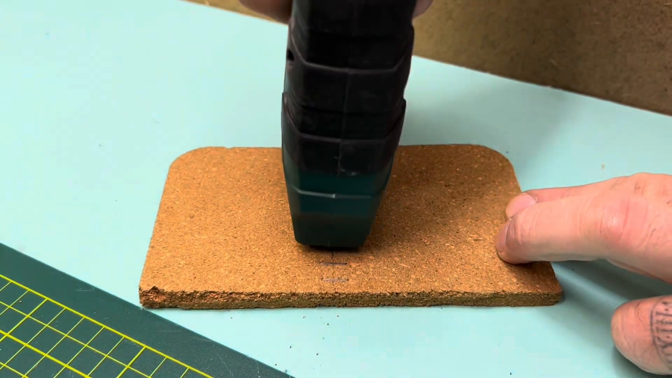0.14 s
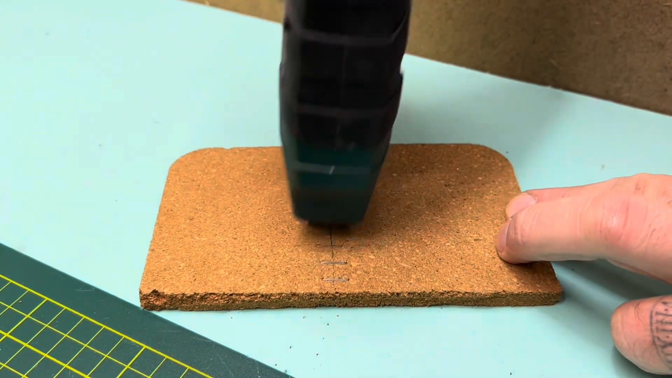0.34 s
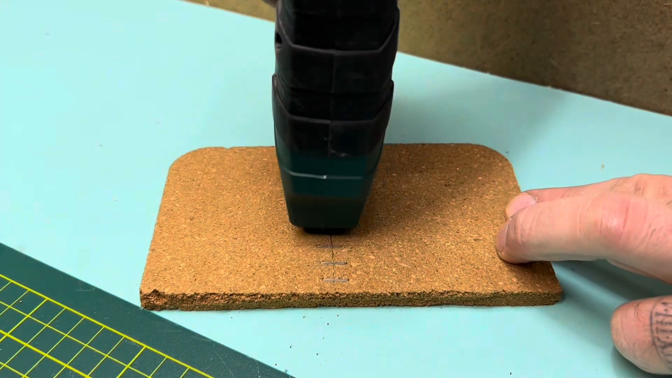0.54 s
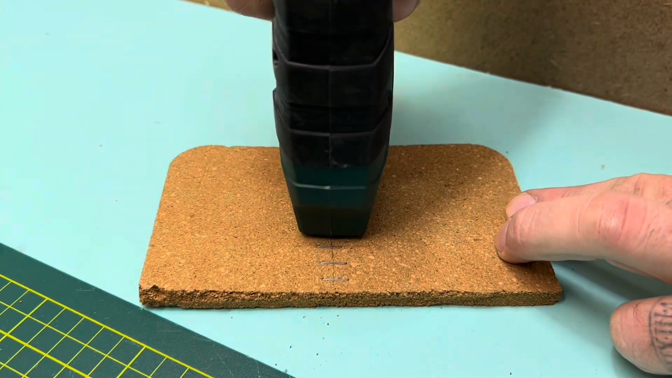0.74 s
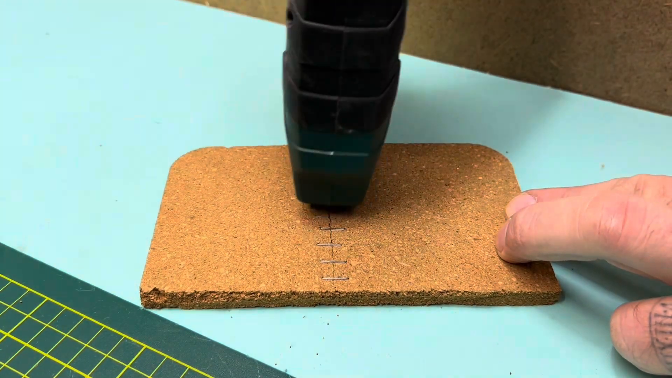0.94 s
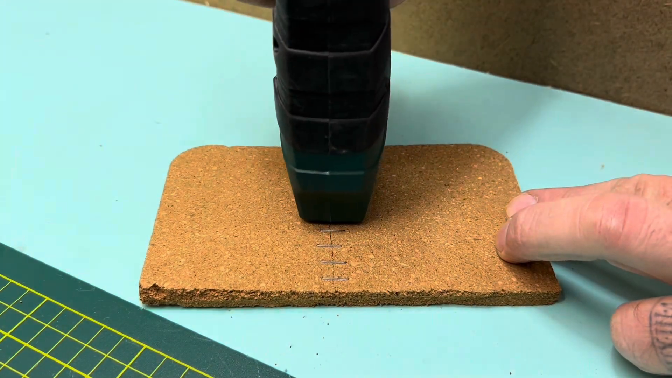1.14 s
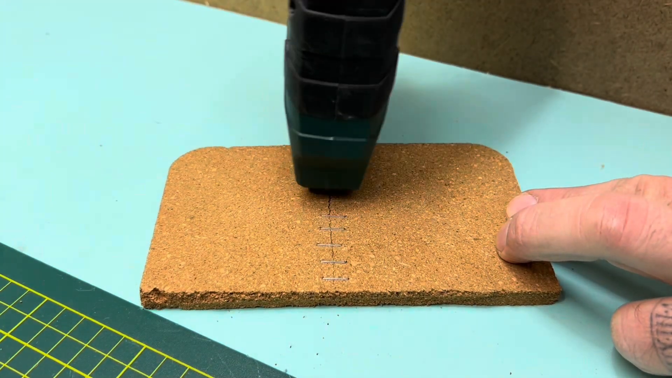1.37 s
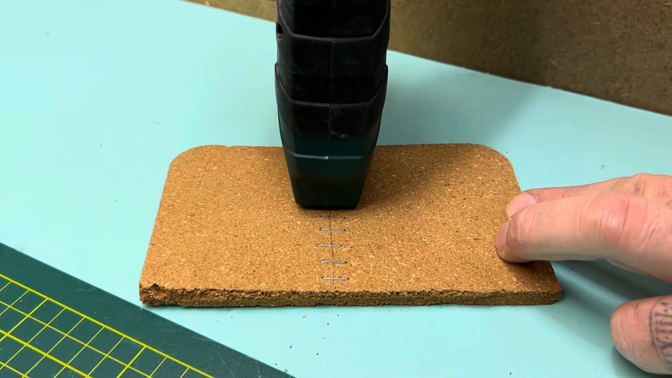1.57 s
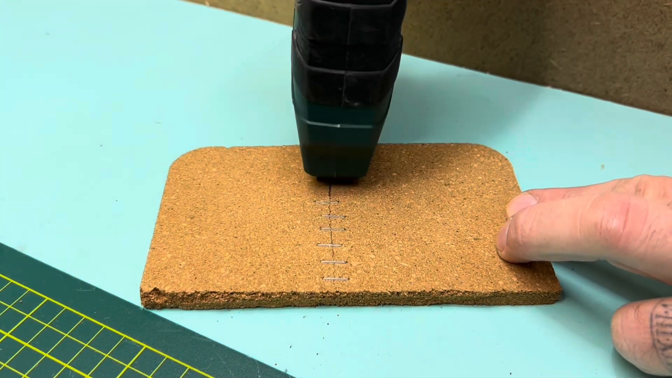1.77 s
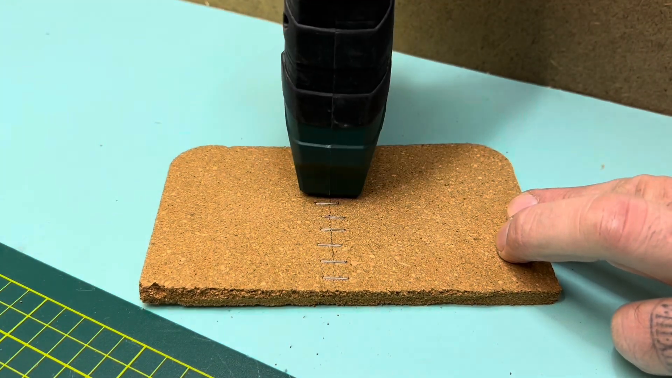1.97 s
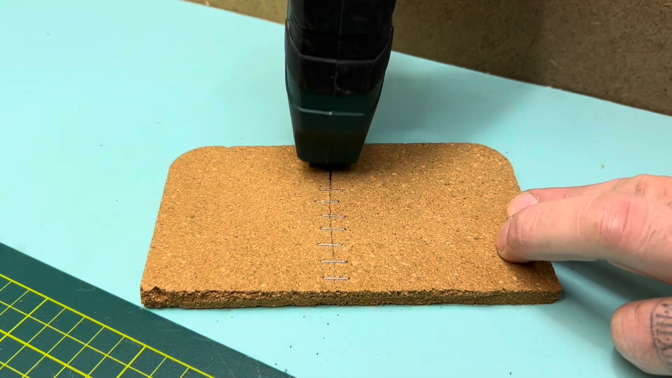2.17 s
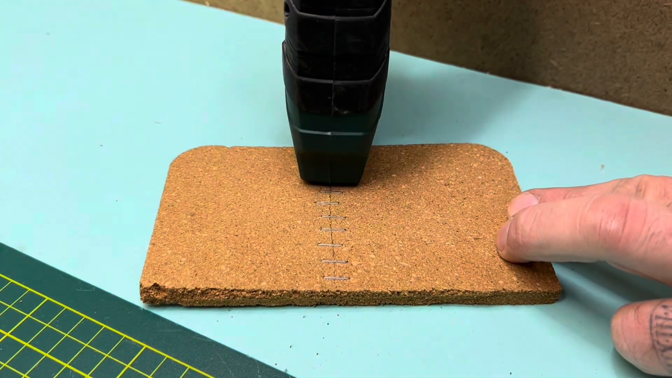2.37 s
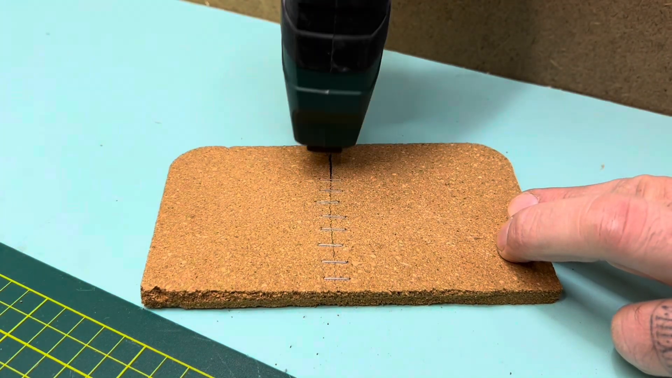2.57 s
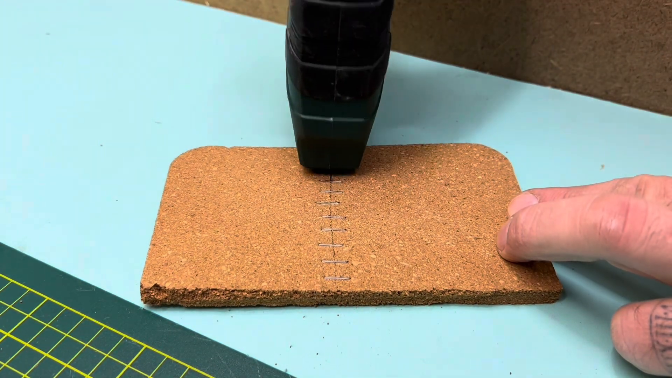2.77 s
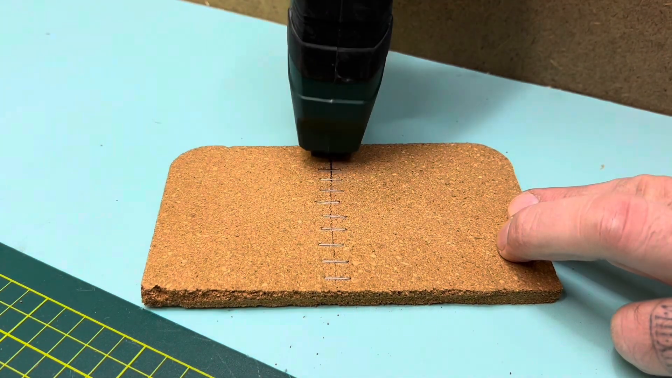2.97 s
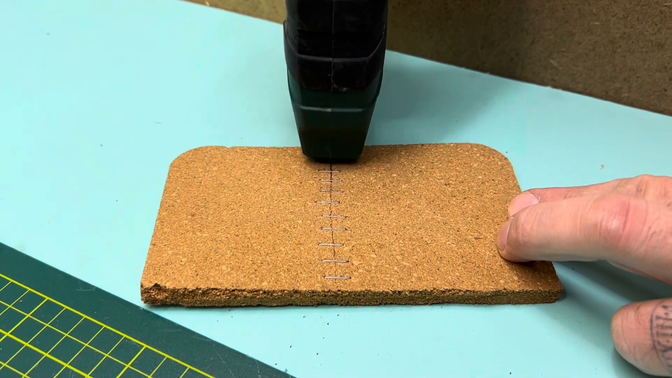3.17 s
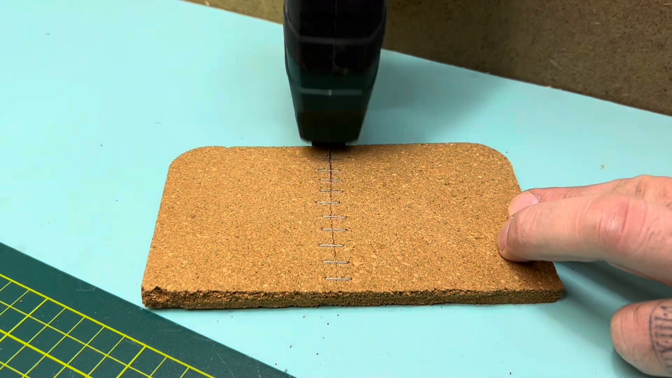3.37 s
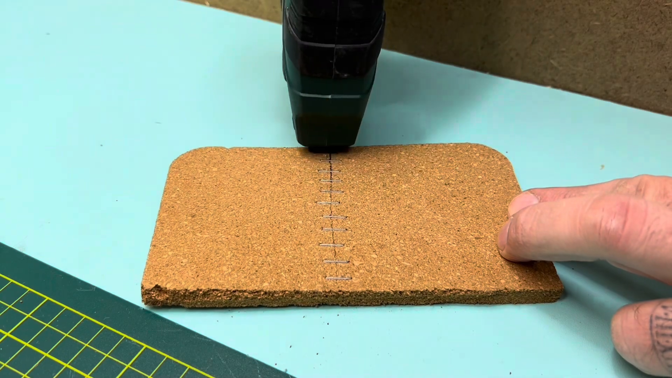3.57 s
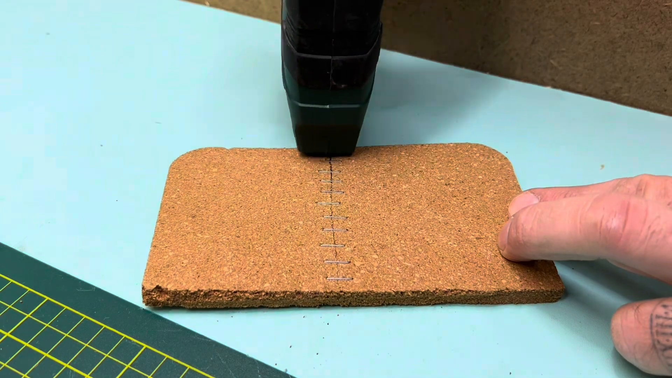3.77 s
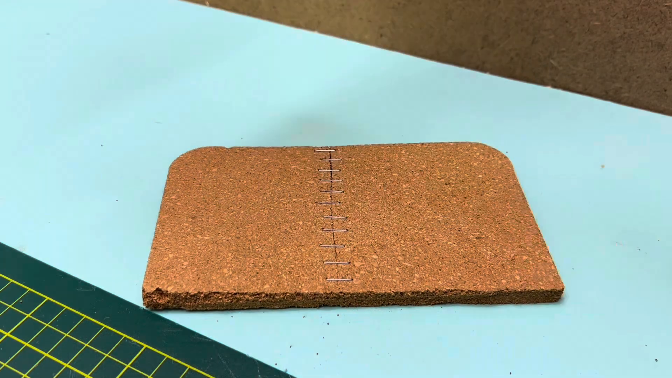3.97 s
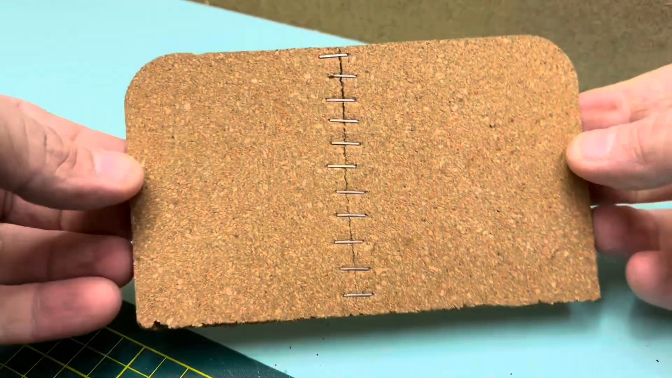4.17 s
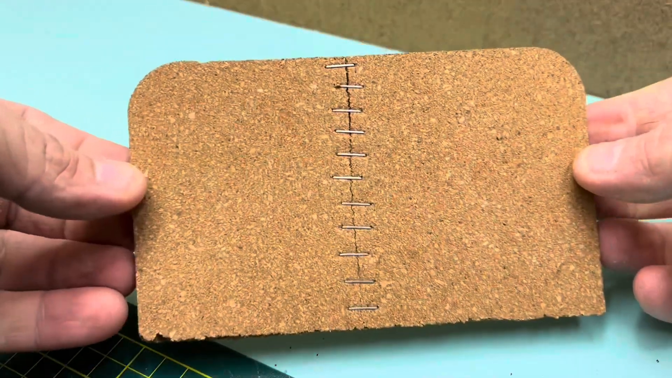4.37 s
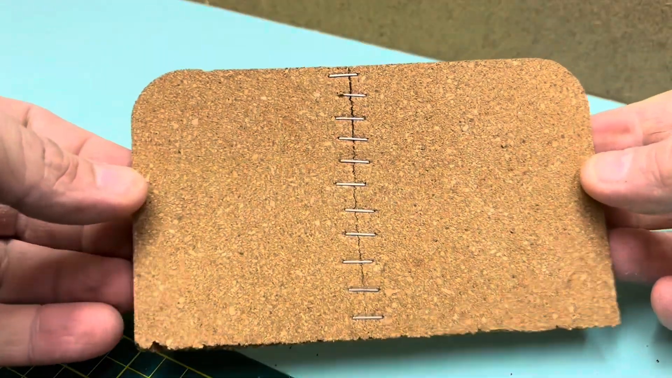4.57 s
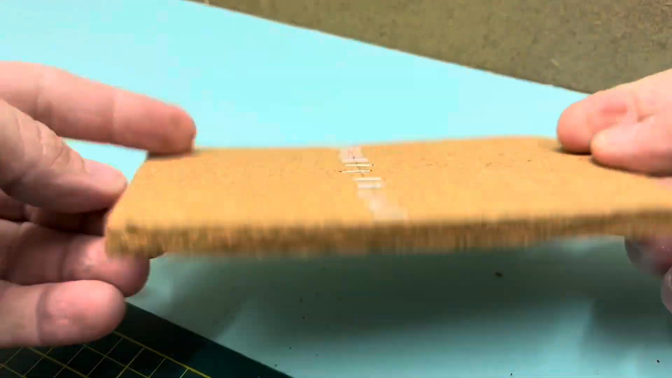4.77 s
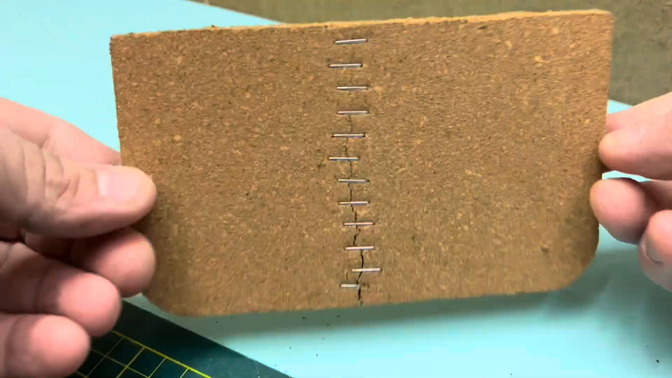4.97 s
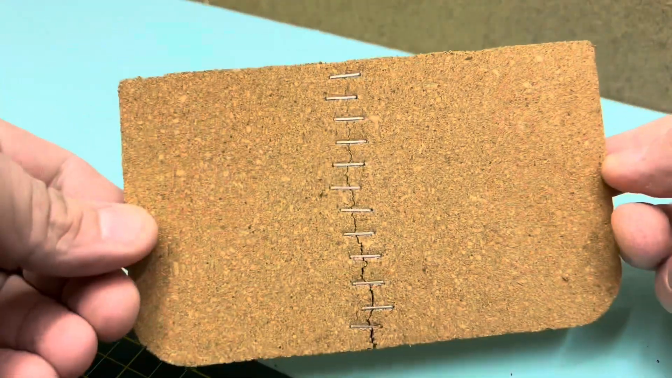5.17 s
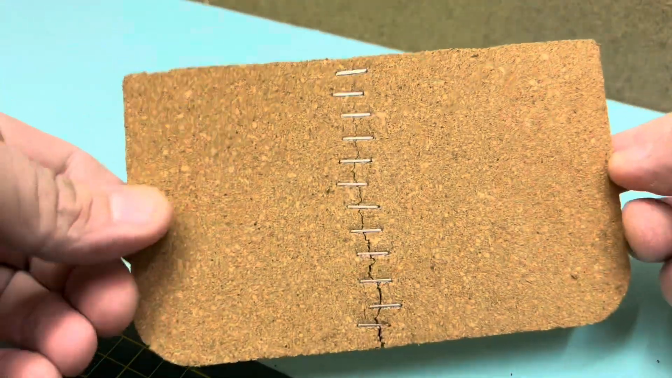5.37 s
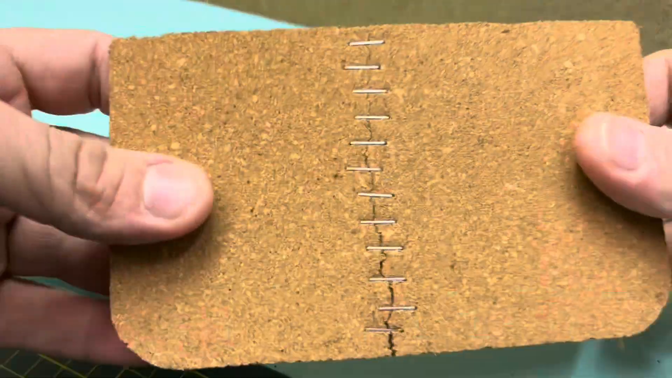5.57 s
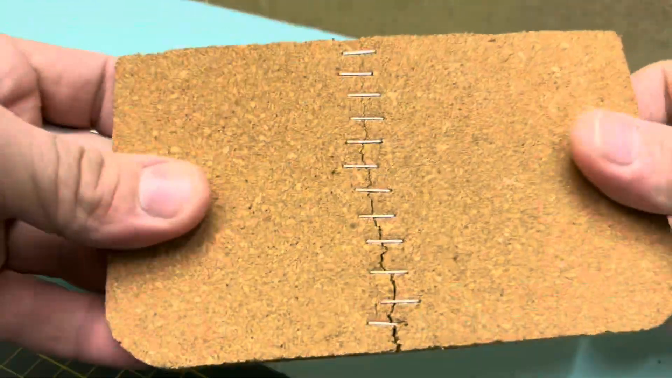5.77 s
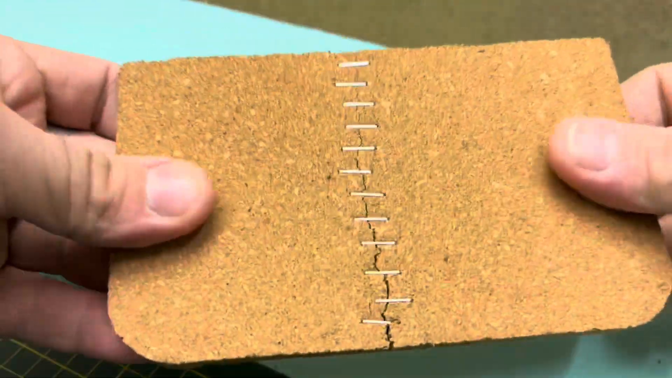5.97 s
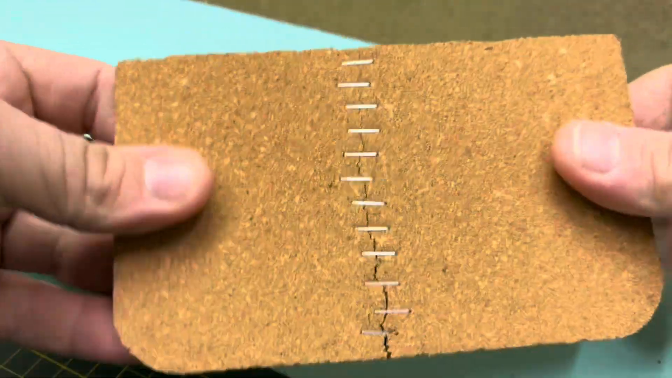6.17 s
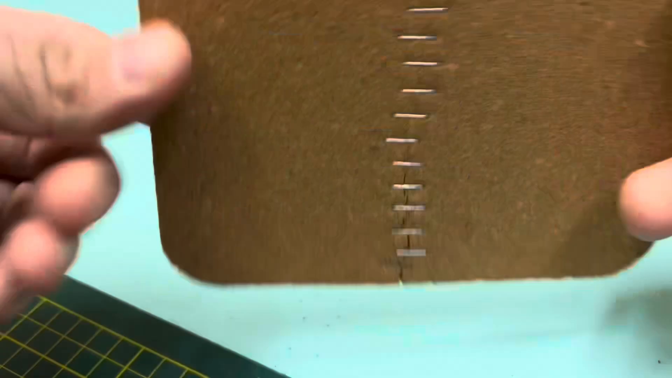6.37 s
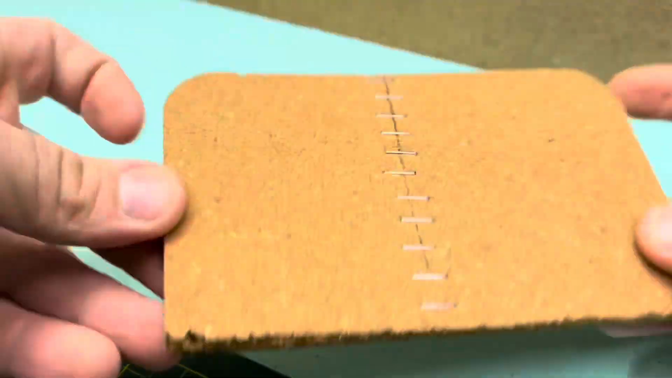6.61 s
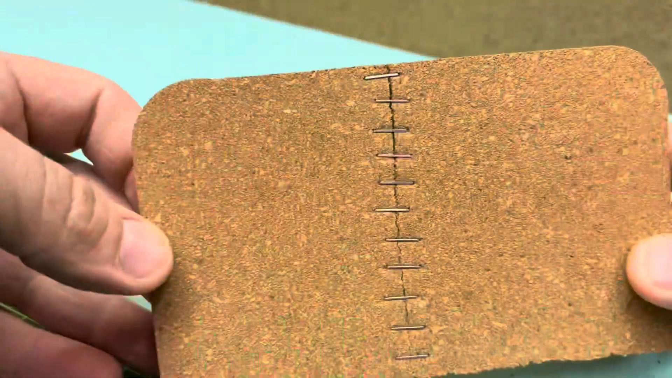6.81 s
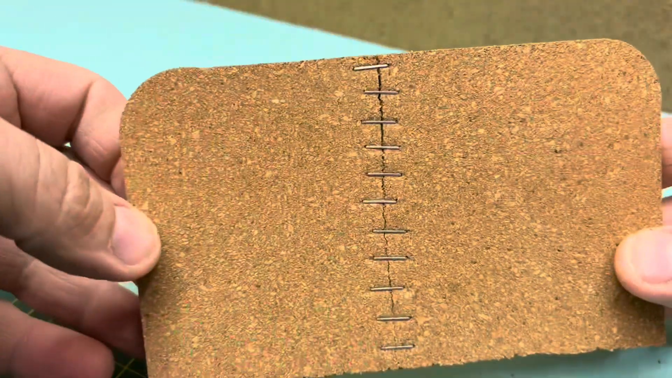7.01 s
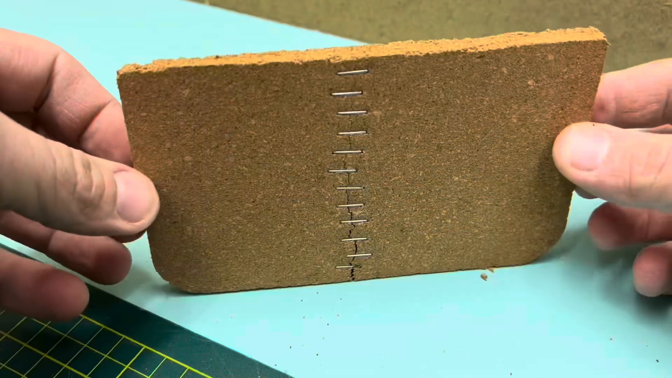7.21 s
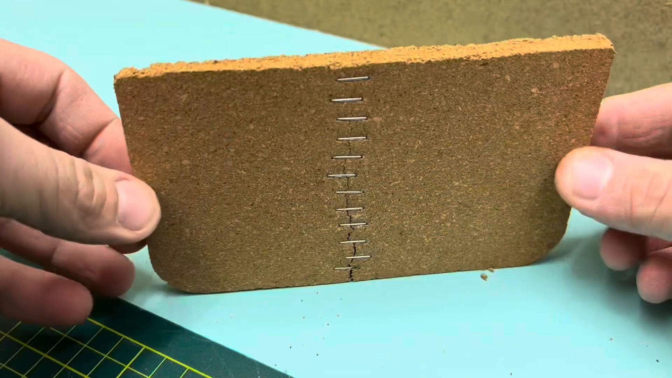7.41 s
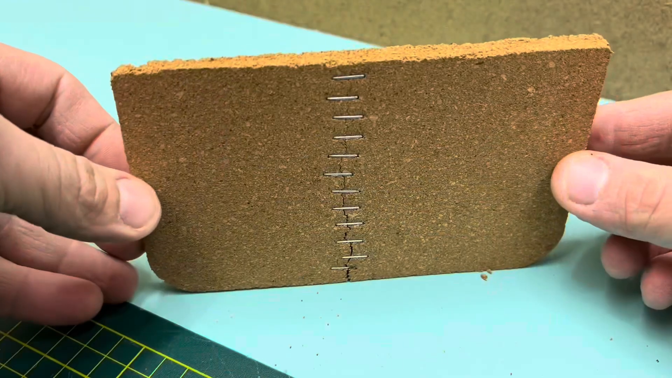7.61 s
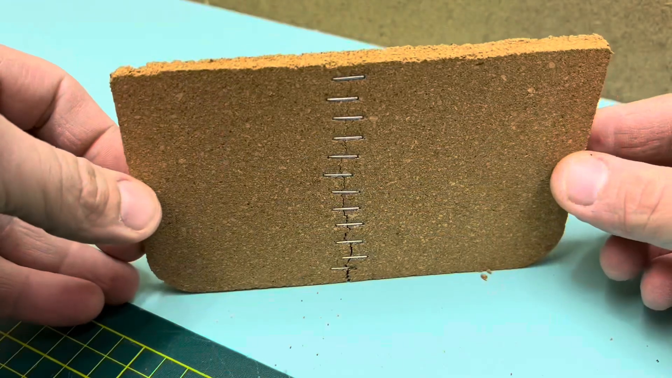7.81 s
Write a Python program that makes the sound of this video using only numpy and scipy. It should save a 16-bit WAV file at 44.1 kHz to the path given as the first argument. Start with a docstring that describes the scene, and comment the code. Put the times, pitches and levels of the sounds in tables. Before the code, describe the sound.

Close stereo pickup at a tabletop in a small room: nine loud stapler shots, a little over two per second, each with a short zipping motor and gear whine leading into a bright snap with a short plastic and metal ring. Small plastic knocks fall between them. At about four seconds it abruptly gives way to faint hiss and rumble, then very quiet skin rasps, crumb ticks and soft pats on cork.

```python
"""Staple gun on a cork mat

A cordless electric staple gun fires nine staples into a cork mat on a table, close to the microphone.
In each cycle the trigger clicks, the motor whine spins up, the gears slow as they wind the spring,
and the striker bangs home: gliding tones and noise, then noise bursts and ringing modes.
Then fingers pick up the mat and turn it over: swelling rasps, ticks and soft bumps above a faint hiss."""
import sys
import numpy as np
from scipy import signal
from scipy.fft import rfft, irfft
from scipy.io import wavfile

SR = 44100
rng = np.random.default_rng(int(sys.argv[2]) if len(sys.argv) > 2 else 0)


def store_wav(level_fs):
    """Save 16-bit WAV to argv[1]."""
    pcm = np.round(np.clip(np.atleast_2d(level_fs), -1, 1) * 32767)
    wavfile.write(sys.argv[1], SR, pcm.T.astype(np.int16))


N = 346185

# the nine shots: (release time [s], motor whine [dB], gears [dB], crack [dB], thump [dB],
# press that sets bass and after-hum [dB], latch slip [dB], spring ring [dB])
SHOTS = [(0.2897, 0.5, -3.5, 4, -1.5, -3, 0.4, -68), (0.806, 0.5, -1, 3.5, -2, -19.5, -0.3, -64),
         (1.2277, 2, -0.5, 2.7, -3, -0.5, -0.4, -61), (1.6551, 6, 0.6, 3, -0.8, 10, -2, -63),
         (2.0663, 5.5, -2, 1.4, -2, 8.5, 3, -76), (2.4713, 7.5, 0.3, 2.2, -3.5, 12, 0.5, -75.5),
         (2.922, 11, 1, 2.7, -3, 10, -6, -83), (3.3283, 6, -0.5, 3, -2.5, 2.2, -3, -77),
         (3.763, -4, -2.2, 4.5, -4, -12.5, -3, -77)]
# overtones of the gear tooth rate, in order: (multiple, level [dB])
TOOTH_OVERTONES = [(1, -17), (2, -1), (3, -4), (4, -15), (5, -14.5), (6, -16.5)]
# metal clicks as the cam engages, the pawl drags, the striker leaves and lands, the motor stops:
# (time from release [s], level [dB], decay [s], treble tilt [dB per octave])
METAL_CLICKS = [(-.0528, -25, 0.0027, 0), (-.006, -25.5, 0.0013, 1), (-.0005, -15.5, .0012, 2),
                (.0006, -14.5, .0008, -2.5), (.059, -51, .004, -7)]
# ringing modes of gun housing and table: (frequency [Hz], level [dB], longest 60 dB decay [s])
BODY_MODES = [(194, -46, .15), (285, -31.5, .04), (358.5, -24.5, 0.11), (447, -26, .04), (508, -23.5, .075),
              (523.2, -28, 0.034), (845, -22, 0.072), (960, -28, 0.018), (1100, -29.5, 0.089),
              (1233, -32.5, 0.049), (1420, -34, 0.045), (1658, -22, 0.063), (1686, -29, 0.038),
              (1930, -44.5, 0.08), (1852, -41, .06), (2403.5, -44, .06), (3219, -42, .1)]
# plastic knocks of the trigger and of the nose set down: (time [s], level [dB], treble [dB])
KNOCKS = [(0.174, -53.5, -5), (0.69, -46.5, -12), (1.112, -47.5, -3), (1.545, -46, -11.5), (1.956, -39, -7),
          (2.359, -35.5, -3.5), (2.809, -35.5, 0), (3.212, -41, -4), (3.41, -30.5, -23), (3.459, -41, -43),
          (3.583, -50, -18), (3.612, -54, -19), (3.652, -39, -3)]
# soft bumps of the mat in the hands: (time [s], level [dB], bass [dB])
MAT_BUMPS = [(4.909, -52, -12), (5.039, -75, 22), (5.473, -58, 7), (5.536, -44.5, 2.5), (6.259, -58, 3.5),
             (6.379, -60, -14.5), (6.459, -53, -11), (7.359, -57.5, 2.5), (7.409, -59.5, -8.5)]
# cork crumbs catching on the skin: (time [s], level [dB])
CRUMBS = [(4.7112, -61), (5.4585, -51), (5.494, -53.5), (5.5378, -59), (5.7094, -60), (6.261, -58),
          (6.4579, -63), (6.5365, -65), (6.5879, -59), (6.7251, -60), (7.358, -64)]
# fingers sliding on cork: (middle [s], length [s], level [dB])
STROKES = [(4.63, .025, -82), (4.72, .025, -75), (4.812, 0.074, -84), (5.424, .05, -77),
           (5.512, 0.093, -67), (5.6, .016, -77.5), (5.705, .035, -83), (6.159, 0.0456, -73.5),
           (6.252, 0.095, -72.5), (6.375, 0.079, -74), (6.468, 0.0648, -70), (6.549, 0.03112, -71),
           (6.728, 0.02847, -82), (7.362, .028, -72.5), (7.428, 0.03027, -80.5)]
# colour of the motor brushes: (frequency [Hz], level [dB])
BRUSH_COLOUR = [(150, -49), (600, -23), (1500, -6.5), (2800, -8.5), (3500, 4.5), (4250, -14.5), (5200, -6),
                (7000, -4.5), (8200, -1), (12000, 3), (13700, 3.5), (16000, 0)]
# colour of grinding gears: (frequency [Hz], level [dB])
GRIND_COLOUR = [(100, -37.5), (400, -6.5), (1100, 1.5), (2000, -2), (3800, -4), (5000, 4), (7000, 1),
                (9500, -4.5), (11500, 3.5), (12600, -8.5), (13900, 7.5), (16000, -3)]
# colour of struck metal: (frequency [Hz], level [dB])
METAL_COLOUR = [(60, -62), (300, -13), (1500, 0.5), (3200, -7), (5400, -3), (6500, -1), (7800, 1),
                (9000, -4.5), (10300, 1.5), (13500, -1.5), (16000, -3.5)]
# colour of the nose thumping the cork: (frequency [Hz], level [dB])
THUMP_COLOUR = [(25, -20.5), (100, -19.5), (180, -8.5), (320, -4), (500, 6), (680, -11.5), (920, 0),
                (1300, -17), (2200, -32), (6000, -61)]
# colour of knocking plastic, also used for the mat's pats: (frequency [Hz], level [dB])
PLASTIC_COLOUR = [(60, -50.5), (150, -26.5), (220, -6), (340, 12), (550, 1), (1000, -2), (1700, -10.5),
                  (3000, -25), (8000, -40.5)]
# colour of skin on cork: (frequency [Hz], level [dB])
SKIN_COLOUR = [(100, -9), (450, 1), (1000, 10.5), (2500, 4.5), (6000, 2), (9000, 2), (15000, 0.5)]
# colour of the high hiss: (frequency [Hz], level [dB])
HIGH_HISS_COLOUR = [(24, -94.5), (40, -59.5), (169, -12.5), (392, -4), (627, -17.5), (824, -13),
                    (1140, -22.5), (1260, -33.5), (2220, -34), (2580, -15.5), (3390, -23.5), (4030, -10),
                    (5560, -7), (6950, -11), (15000, -53)]
# colour of the rumble: (frequency [Hz], level [dB])
RUMBLE_COLOUR = [(18, -62), (30, -42), (81, -8), (135, -3), (232, -2.5), (287, -14.5), (373, -9.5),
                 (888, -28.5), (1320, -12.5), (1500, -19.5), (1950, -35), (3300, -120)]
# colour of the lower hiss: (frequency [Hz], level [dB])
LOW_HISS_COLOUR = [(1000, -28.5), (1330, -13.5), (1580, -15), (2100, 1), (2700, 3.5), (3400, 1),
                   (4200, -13.5), (5300, -26.5), (6400, -25.5), (8500, -37), (15000, -48)]
# the gun's phase between the two microphone ports: (frequency [Hz], lead of the left [radians])
PORT_PHASE = [(0, -1), (2070, -0.55), (2330, 1), (2840, 1.07), (3360, 1.0), (4650, 1.35), (5430, 1.5),
              (5680, 6), (6290, 4), (6890, 5), (12300, 7.5), (13400, 6.5), (14100, 6.5), (16400, 9)]
# resonances of the gun's shell and steel magazine: (frequency [Hz], width [Hz], boost [dB])
SHELL_BANDS = [(4586, 120, -0.5), (4840, 260, 6.5), (5380, 190, 8.5), (6590, 370, 5.5), (7040, 270, 3),
               (8040, 200, 9), (8210, 140, 4), (10264, 120, 3.5), (11613, 250, 5.5), (13570, 250, 0.5),
               (14228, 120, 6.5)]
# brief dips of the lower hiss and rumble: (time [s], depth [dB])
DIPS = [(4.118, -16.5), (7.182, -17.5)]

# top of the passband; no gear overtone sounds above it either
TOP_HZ = 15900
# a cycle's sound starts LEAD_S before the release and lasts CYCLE_S
LEAD_S, CYCLE_S = 0.12, 0.4
# times from release: motor switched on, cam takes up the spring, load peaks, motor stops
SWITCH_S, ENGAGE_S, PEAK_LOAD_S, STOP_S = -0.093, -0.0528, -0.0183, 0.06
# nominal motor whine and gear tooth rate at full speed
MOTOR_HZ, TOOTH_HZ = 984, 5200
# share of full speed reached at once, and share lost at peak load
KICK, SAG = 0.5, 0.571
# time constants of the motor's spin-up and run-down
SPIN_UP_S, RUN_DOWN_S = 0.0105, 0.045
# the high hiss cross-fades to the lower one around this moment
CHANGE_S, CROSSFADE_S = 3.912, 0.015


def amp(db):
    """Decibels to gain."""
    return 10 ** (np.asarray(db) / 20)


def unit(x):
    """Scale to rms 1."""
    return x / np.sqrt(np.mean(x ** 2))


def across(points, size, tilt=0):
    """Read (Hz, value) points at the bins of a transform, with a slope per octave."""
    hz, value = np.transpose(points)
    octaves = np.log2(np.abs(hz) + 1)
    bins = np.log2(np.fft.rfftfreq(size, 1 / SR) + 1)
    return np.interp(bins, octaves, value + tilt * (octaves - octaves[-1]))


def noise(points, size, tilt=0):
    """Coloured noise of rms 1."""
    spectrum = rfft(rng.standard_normal(size)) * amp(across(points, size, tilt))
    return unit(irfft(spectrum, size))


def pulse(points, size, tilt=0):
    """The most compact causal pulse with a given spectrum, peak 1."""
    cepstrum = irfft(np.log(amp(across(points, size, tilt))), size)
    # folding the cepstrum forward in time gives minimum phase
    cepstrum[1:size // 2] *= 2
    cepstrum[size // 2 + 1:] = 0
    y = irfft(np.exp(rfft(cepstrum)), size)
    return y / np.abs(y).max()


def fade(t, decay):
    """Sudden onset at t = 0, then exponential decay."""
    return (t >= 0) * np.exp(-np.abs(t) / decay)


def rise(t, length):
    """A straight ramp from 0 at t = 0 to 1 after the given length."""
    return np.clip(t / length, 0, 1)


def release(t, decay):
    """Hold at 1 until t = 0, then exponential decay."""
    return np.exp(-np.maximum(t, 0) / decay)


def add(track, s, sound):
    """Mix a sound into a track from time s on."""
    i = max(int(s * SR), 0)
    track[..., i:i + sound.shape[-1]] += sound[..., :track.shape[-1] - i]


def spread(make, likeness):
    """Two channels that share part of a random sound."""
    share = np.clip(likeness, 0, 1)
    common = np.sqrt(share) * make()
    return common + np.sqrt(1 - share) * np.array([make(), make()])


def burst(points, envelope, tilt=0):
    """A rough contact force, following an envelope, heard through a material's colour."""
    colour = pulse(points, size=2048, tilt=tilt)
    force = envelope * rng.standard_normal(len(envelope))
    return signal.fftconvolve(force, colour / np.linalg.norm(colour))[:len(envelope)]


def echoes(x, colour, db, decay):
    """A fading cloud of reflections, different at each port."""
    t = np.arange(SR // 2) / SR
    cloud = [unit(burst(colour, fade(t - 0.0006, decay))) for _ in range(2)]
    cloud = np.array(cloud) / np.sqrt(len(t))
    return amp(db) * signal.fftconvolve(np.atleast_2d(x), cloud, axes=1)[:, :x.shape[-1]]


def afterwards():
    """0 during the work, 1 once the hiss has changed."""
    return rise(np.arange(N) / SR - CHANGE_S + CROSSFADE_S / 2, CROSSFADE_S)


def high_hiss(db=-63):
    """A faint high hiss: coloured noise partly shared by the two channels."""
    return amp(db) * spread(lambda: noise(HIGH_HISS_COLOUR, N), likeness=0.54)


def low_hiss(db=-59, pan_db=5.0, lag=8):
    """A lower hiss, stronger on the left, where it lags by a few samples."""
    left, right = amp(db) * spread(lambda: noise(LOW_HISS_COLOUR, N), likeness=0.35)
    return np.array([amp(pan_db) * np.roll(left, lag), amp(-pan_db) * right])


def rumble(db=-69.5):
    """A soft rumble, nearly alike in both channels, whose level swells at random."""
    # the added last point holds the colour at -59 dB above 3 kHz
    colour = RUMBLE_COLOUR + [(3000, -59)]
    swell = amp(1.74 * noise([(1, 3), (6, -4), (20, -31), (100, -80)], N))
    return swell * amp(db) * spread(lambda: noise(colour, N), likeness=0.86)


def background(dip_width_s=0.014, weaker_db=-4):
    """High hiss during the work, then lower hiss and rumble, weaker until the first of brief dips."""
    t, late = np.arange(N) / SR, afterwards()
    level_db = weaker_db * (t < DIPS[0][0])
    level_db = level_db + sum(db * np.exp(-((t - s) / dip_width_s) ** 2) for s, db in DIPS)
    return (1 - late) * high_hiss() + late * amp(level_db) * (low_hiss() + rumble())


def body(t, scatter_db=2, detune=0.007, cut_hz=150, max_cycles=120):
    """Housing and table ring, with the deep bass held back; every blow weights the modes differently."""
    ring = np.zeros(len(t))
    for hz, db, t60 in BODY_MODES:
        level_chance, pitch_chance = rng.standard_normal(2)
        # plastic is lossy: a mode fades by 60 dB within max_cycles
        decay = min(t60, max_cycles / hz) / np.log(1000)
        tone = np.sin(2 * np.pi * hz * (1 + detune * pitch_chance) * t)
        ring += amp(db + scatter_db * level_chance) * tone * fade(t, decay)
    return signal.sosfilt(signal.butter(2, cut_hz, "high", fs=SR, output="sos"), ring)


def knock(t, treble_db):
    """Loose plastic parts meet in a few small contacts around one main one."""
    touches = sum(amp(-14.5) * fade(t - at, 0.0026) for at in rng.uniform(-0.029, 0.028, 4))
    tick = amp(treble_db) * burst(METAL_COLOUR, fade(t, 0.00081) + 0.3 * touches)
    plastic = amp(-1.0) * burst(PLASTIC_COLOUR, fade(t, 0.01) + touches)
    return plastic + amp(6) * body(t - 0.002) + tick


def trigger(t, db=-47, at_s=-0.115, decay=0.0011):
    """The trigger's switch gives a thin, high tick just before the motor starts."""
    colour = [(2000, -30), (6500, -22.5), (8500, -0.5), (16000, 0)]
    return amp(db) * burst(colour, fade(t - at_s, decay))


def speed(t):
    """Share of full speed: spin-up, one arch of sag as the cam winds the spring, run-down on release."""
    spin = 1 - (1 - KICK) * release(t - SWITCH_S, SPIN_UP_S)
    load = np.maximum(1 - ((t - PEAK_LOAD_S) / (PEAK_LOAD_S - ENGAGE_S)) ** 2, 0)
    return np.clip(spin * (1 - SAG * load) * release(t, RUN_DOWN_S), 1e-3, 1)


def motor(t, whine_db, rough=0.18, tone_db=-40, tone_law=6.6, choke_s=0.003, brush_db=-31.0,
          brush_law=0.41, attack_s=0.003, brake_s=0.008, coast_db=-19, still_s=0.006):
    """Whine and brush fizz grow with speed; load chokes the whine, and the brushes coast to a stop."""
    v = speed(t)
    phase = 2 * np.pi * np.cumsum(MOTOR_HZ * v * (1 + 0.02 * rng.standard_normal())) / SR
    flutter = 1 + rough * noise([(30, -0.5), (200, -1), (800, -31.5)], len(t))
    whine = np.sqrt(2) * flutter * (np.sin(phase) + amp(-16.5) * np.sin(3 * phase))
    brushes = noise(BRUSH_COLOUR, len(t)) * (1 + 0.25 * np.sin(phase))
    # after the release the fizz drops to a quiet coast, until the motor stops
    power = release(t, brake_s) + amp(coast_db) * (t > 0) * release(t - STOP_S, still_s)
    whine_level = amp(tone_db + whine_db) * v ** tone_law * release(t - ENGAGE_S, choke_s)
    brush_level = amp(brush_db) * v ** brush_law * power
    return rise(t - SWITCH_S, attack_s) * (whine_level * whine + brush_level * brushes)


def gears(t, rough=0.45, chatter_db=2.0, snag_rate=260, free_db=-42, free_law=5.0, loaded_db=-30,
          strain_db_per_s=110, grind_db=-32.5, bite_db=-31, bite_s=0.014, whine_stop_s=0.00083,
          grind_stop_s=0.003):
    """Free teeth sing faintly; loaded, they whine louder as the spring tightens, and grind and snag."""
    shake = [(30, -2.0), (300, -2.0), (1500, -33.0)]
    v = speed(t)
    wound_s = np.clip(t, ENGAGE_S, 0) - ENGAGE_S
    wobble = 0.015 * rng.standard_normal() + 0.0066 * noise(shake, len(t))
    hz = TOOTH_HZ * v * (1 + wobble)
    phase = 2 * np.pi * np.cumsum(hz) / SR
    whine = np.zeros(len(t))
    for k, (_, db) in enumerate(TOOTH_OVERTONES, 1):
        flutter = 1 + rough * noise(shake, len(t))
        whine += amp(db) * (k * hz < TOP_HZ) * np.sin(k * phase) * flutter
    snag_starts = rng.random(len(t)) < snag_rate / SR
    snags = signal.fftconvolve(snag_starts, fade(t + LEAD_S, 0.0005))[:len(t)]
    chatter = unit(amp(chatter_db * noise(shake, len(t))))
    grind = noise(GRIND_COLOUR, len(t)) * (0.99 * chatter + 1.3 * snags)
    loaded = amp(loaded_db + strain_db_per_s * wound_s)
    free = amp(free_db) * v ** free_law * (t > SWITCH_S)
    singing = np.where(t > ENGAGE_S, loaded, free)
    # the grinding is hardest as the cam bites
    grinding = amp(grind_db) * (t > ENGAGE_S) + amp(bite_db) * fade(t - ENGAGE_S, bite_s)
    whine_part = singing * release(t + 0.0025, whine_stop_s) * whine
    return whine_part + grinding * release(t, grind_stop_s) * grind


def shell(x, trim_db=-1.5, grip_db=1.0):
    """Narrow shell bands make the gliding whine flare as it crosses; each new grip shifts the colour."""
    f = np.fft.rfftfreq(len(x), 1 / SR)
    boost_db = sum(db / (1 + (2 * (f - hz) / width) ** 2) for hz, width, db in SHELL_BANDS)
    grid = np.linspace(1200, TOP_HZ, 80)
    ripple_db = grip_db * np.interp(f, grid, rng.standard_normal(len(grid)), left=0)
    return irfft(rfft(x) * amp(boost_db + ripple_db + trim_db), len(x))


def metal_clicks(t, scatter_db=1.97):
    """Metal parts meet in short rough bursts whose levels vary from shot to shot."""
    return sum(amp(db + scatter_db * rng.standard_normal()) * burst(METAL_COLOUR, fade(t - at, decay), tilt)
               for at, db, decay, tilt in METAL_CLICKS)


def latch_slip(t, db):
    """The latch slips just before the release: a short, bright metal burst."""
    return amp(db - 19) * burst(METAL_COLOUR, fade(t + 0.0127, 0.002), tilt=3.7)


def spring(t, hz=12550, second_hz=12320, decay=0.055):
    """The released steel spring sings on faintly in two close modes."""
    modes = np.sin(2 * np.pi * hz * t) + amp(-7.0) * np.sin(2 * np.pi * second_hz * t)
    return modes * fade(t, decay)


def striker(t, press_db, deep_db=-41, deep_s=0.0011):
    """The staple goes in: the nose thumps the cork and bounces, and the housing rings and rattles."""
    y = amp(-8.5) * body(t - 0.0012) + amp(-3.0) * body(t - 0.0044)
    push = pulse(THUMP_COLOUR, size=2048)
    add(y, LEAD_S + 0.0018, -amp(-22.5) * push)
    add(y, LEAD_S + 0.004077, amp(-11.0) * push)
    add(y, LEAD_S + 0.0066, amp(-23.5 + 2.5 * rng.standard_normal()) * push)
    # a firmer press sends more bass into the table
    deep = amp(deep_db + 1.7 * press_db) * np.exp(-((t - 0.0048) / deep_s) ** 2)
    rattle = amp(-24.5) * burst(METAL_COLOUR, fade(t - 0.002, 0.0099), tilt=-0.61)
    rough_thump = amp(-25.5) * burst(THUMP_COLOUR, fade(t - 0.002, 0.014))
    return y + deep + rattle + rough_thump


def after_hum(t, hz=192, peak_s=0.048, width_s=0.02):
    """A low hum swells and dies while the motor runs down."""
    return np.sin(2 * np.pi * hz * t) * np.exp(-((t - peak_s) / width_s) ** 2)


def ports(x, early_db=-9.0, early_s=0.0058):
    """Direct sound at the two ports, plus quick table and wall reflections drawn afresh for each sound."""
    # long waves reach both ports alike
    apart = across([(700, 0), (2000, 1)], len(x))
    turn = np.exp(0.5j * apart * across(PORT_PHASE, len(x)))
    direct = irfft(rfft(x) * np.array([turn, turn.conj()]), len(x))
    early = [(60, -13), (500, -12), (1100, -5), (2300, 5), (5000, 1), (8500, -4), (15000, -1)]
    return direct + echoes(x, early, early_db, early_s)


def stapler():
    """Nine firing cycles, and the plastic knocks around them."""
    out = np.zeros((2, N))
    t = np.arange(int(CYCLE_S * SR)) / SR - LEAD_S
    for s, whine_db, gear_db, crack_db, thump_db, press_db, latch_db, spring_db in SHOTS:
        drive = shell(motor(t, whine_db) + amp(gear_db) * gears(t)) + latch_slip(t, latch_db)
        blow = amp(crack_db) * metal_clicks(t) + amp(thump_db) * striker(t, press_db)
        tail = amp(spring_db + 4.5) * spring(t) + amp(press_db - 45.5) * after_hum(t)
        add(out, s - LEAD_S, ports(trigger(t) + drive) + ports(blow + tail))
    for s, db, treble_db in KNOCKS:
        add(out, s - LEAD_S, ports(amp(db) * knock(t, treble_db)))
    return out


def room(x, tail_db=-28.5, tail_s=0.034, boom_db=-41, boom_s=0.13):
    """The small room adds a faint dry tail and a lingering low ring."""
    tail = [(60, -11), (150, -5), (500, 11.5), (2000, 12), (7000, -2.5), (15000, -14)]
    boom = [(110, -35.5), (185, -3.0), (280, -11.0), (420, -5), (490, 0), (600, -23.5),
            (800, -11), (1300, -27.5), (5000, -52), (15000, -74.5)]
    return x + echoes(x, tail, tail_db, tail_s) + echoes(x, boom, boom_db, boom_s)


def rasp(grain_db=2.5, rub_db=4.0):
    """Skin rasps over cork grains in strokes that swell and ebb."""
    clock = np.arange(N) / SR
    sliding = sum(amp(db) * np.exp(-(2 * (clock - s) / length) ** 2) for s, length, db in STROKES)
    grains = unit(amp(grain_db * noise([(10, 2), (400, -8), (2000, -10)], N)))
    return burst(SKIN_COLOUR, amp(rub_db) * sliding * grains)


def mat_bump(t, bass_db):
    """The mat pats softly against the hands and flexes with a low, rough thud."""
    pat = burst(PLASTIC_COLOUR, fade(t, 0.014) - fade(t, 0.0038))
    flex_colour = [(25, -31), (85, 12.0), (160, 6), (500, -39), (2000, -72)]
    flex = burst(flex_colour, fade(t, 0.025) - fade(t, 0.004))
    return pat + amp(bass_db - 4.5) * flex


def hands():
    """Fingers rasp, crumbs tick and the mat bumps, a little stronger on the left."""
    t = np.arange(SR // 4) / SR
    out = rasp()
    for s, db in CRUMBS:
        add(out, s, amp(db - 5) * burst(SKIN_COLOUR, fade(t, 0.0026)))
    for s, db, bass_db in MAT_BUMPS:
        add(out, s, amp(db - 2.5) * mat_bump(t, bass_db))
    return out * amp(np.array([[1.5], [-1.5]]))


def scene():
    """The stapler in a small room; when the hiss changes the scene changes, cutting off the stapler and its
    room's ring at once, and the hands take over."""
    return background() + (1 - afterwards()) * room(stapler()) + hands()


def record(dry):
    """The recorder cuts the top with a steep low-pass."""
    return signal.sosfilt(signal.ellip(10, 0.2, 70, TOP_HZ, fs=SR, output="sos"), dry)


dry = scene()
out = record(dry)
store_wav(out)
```